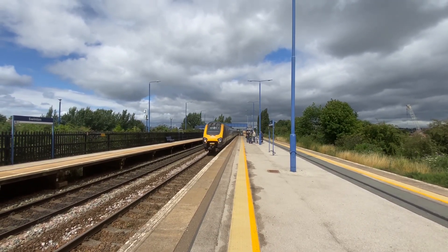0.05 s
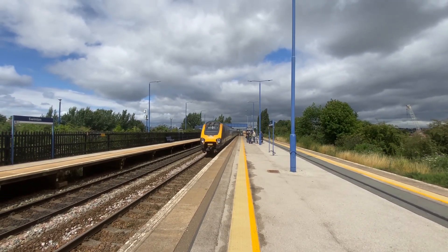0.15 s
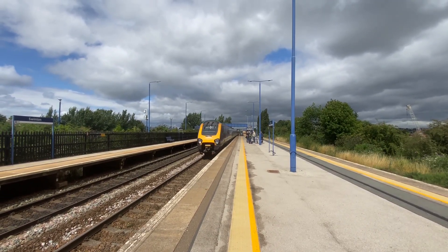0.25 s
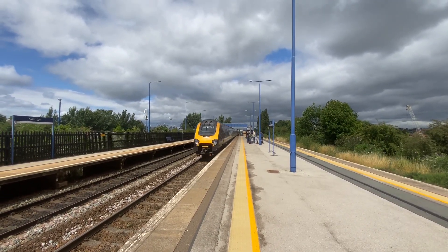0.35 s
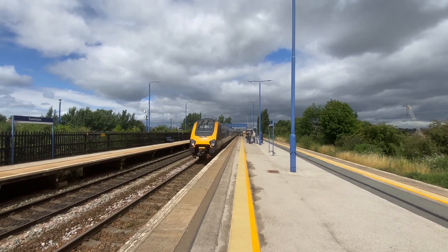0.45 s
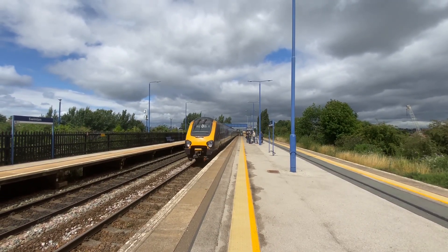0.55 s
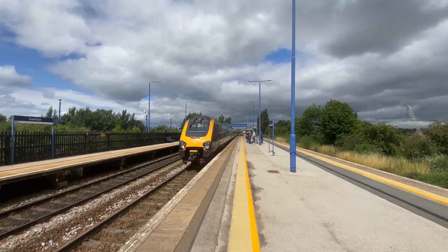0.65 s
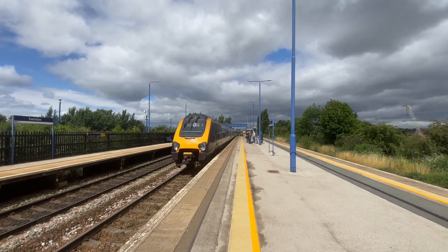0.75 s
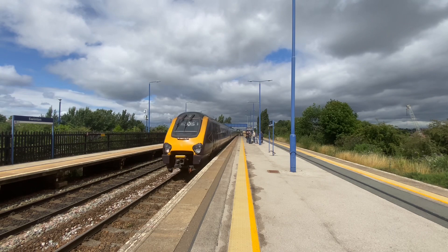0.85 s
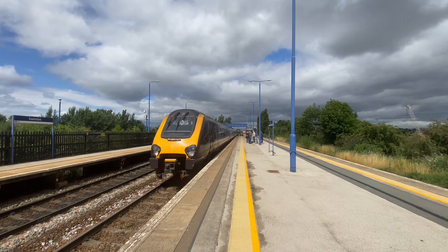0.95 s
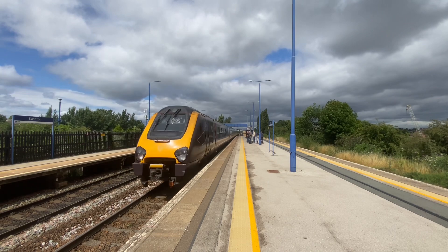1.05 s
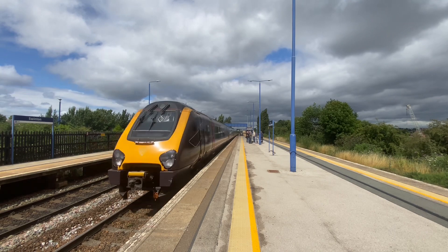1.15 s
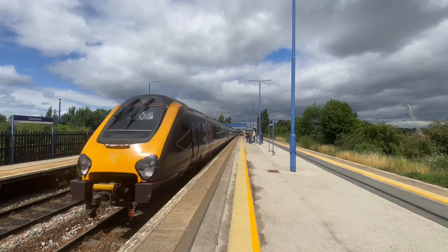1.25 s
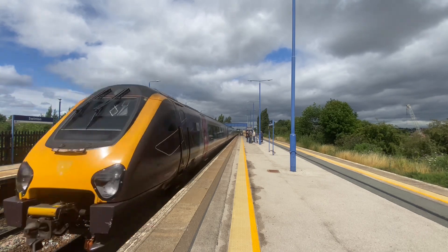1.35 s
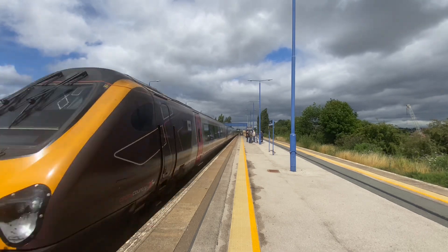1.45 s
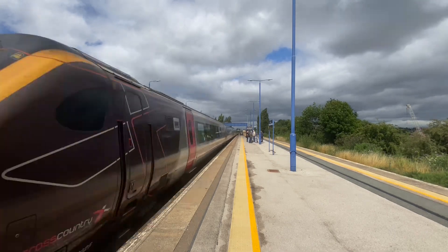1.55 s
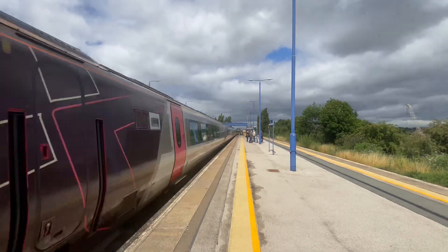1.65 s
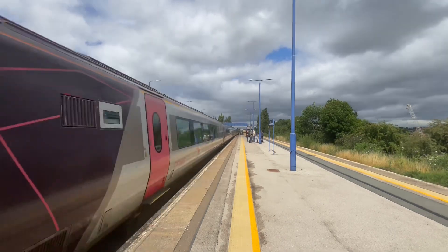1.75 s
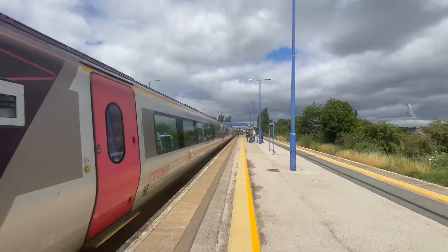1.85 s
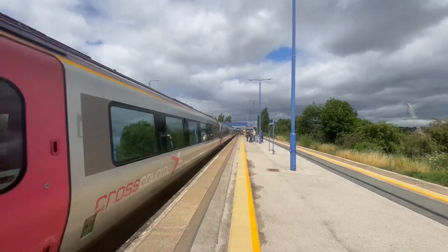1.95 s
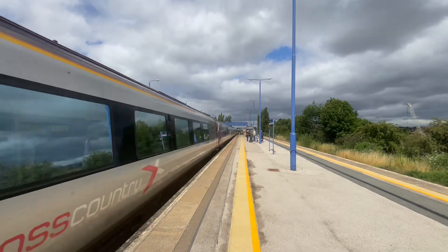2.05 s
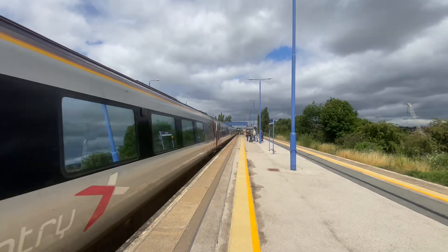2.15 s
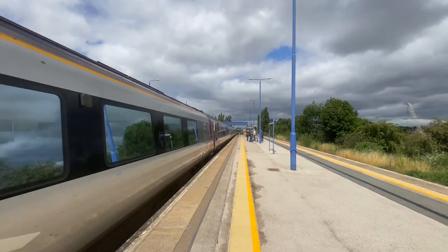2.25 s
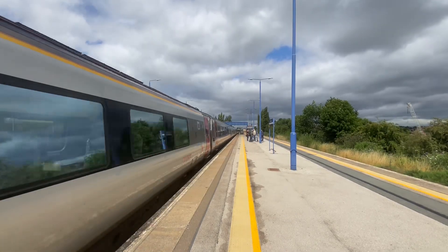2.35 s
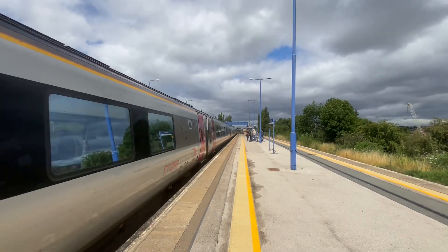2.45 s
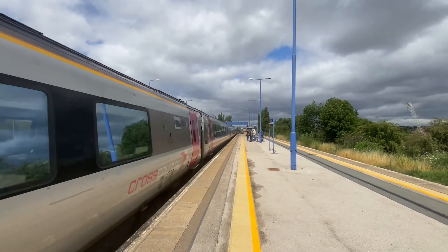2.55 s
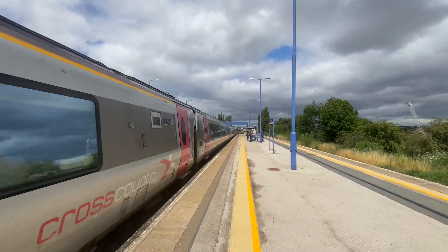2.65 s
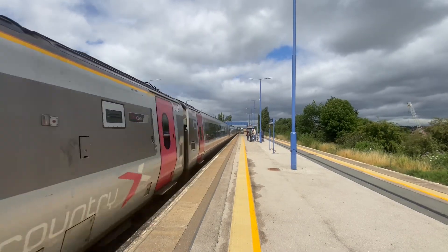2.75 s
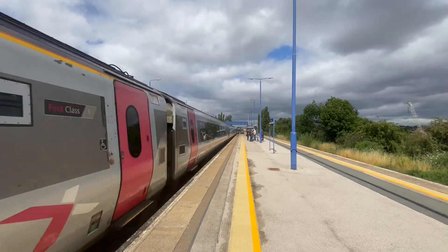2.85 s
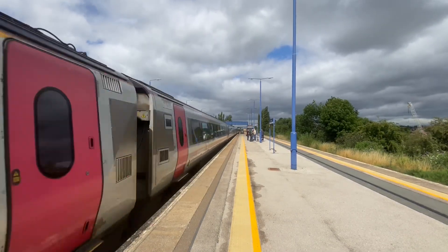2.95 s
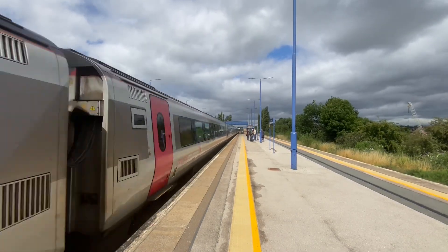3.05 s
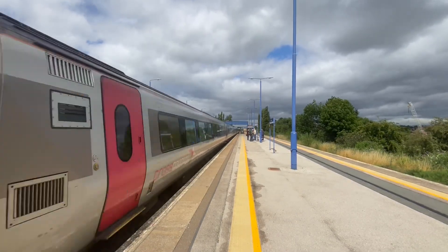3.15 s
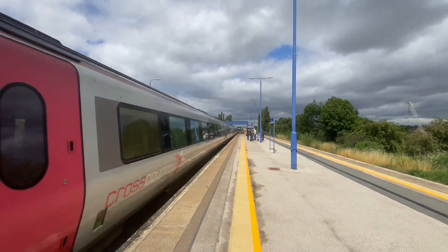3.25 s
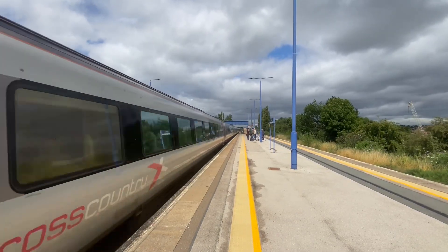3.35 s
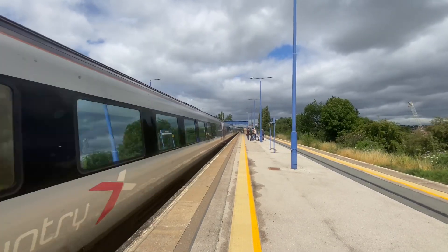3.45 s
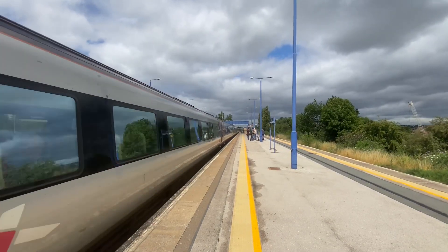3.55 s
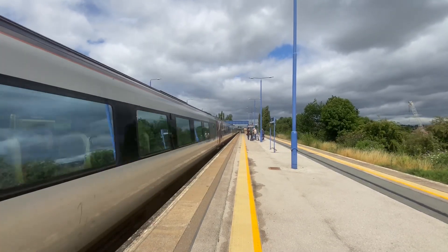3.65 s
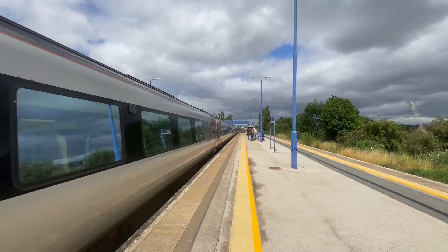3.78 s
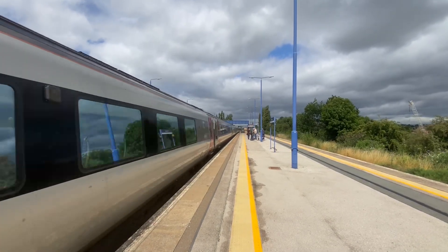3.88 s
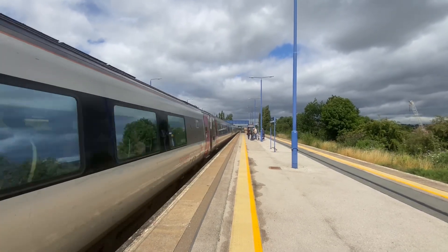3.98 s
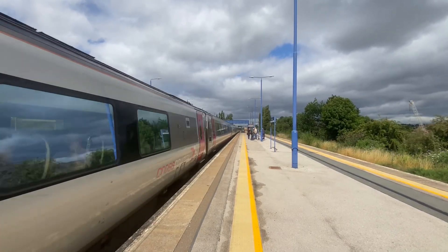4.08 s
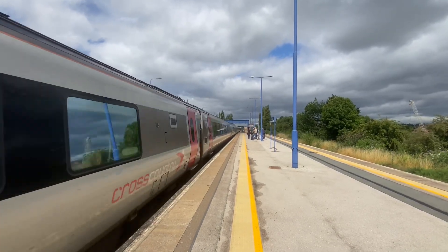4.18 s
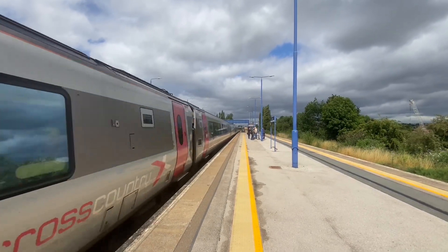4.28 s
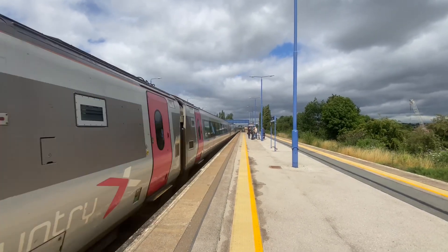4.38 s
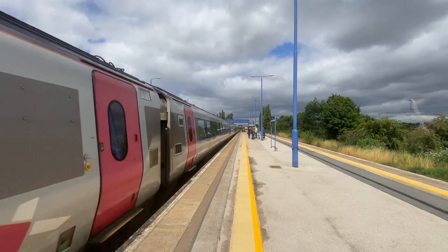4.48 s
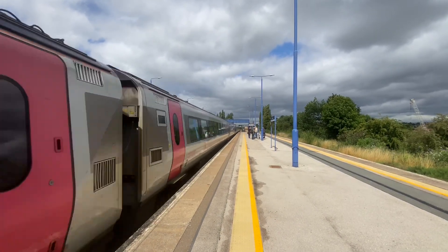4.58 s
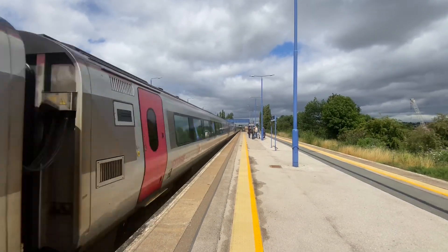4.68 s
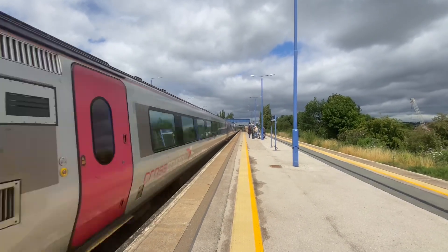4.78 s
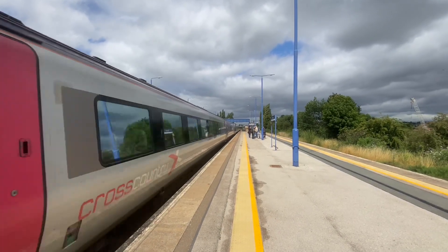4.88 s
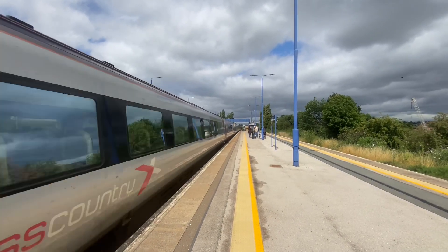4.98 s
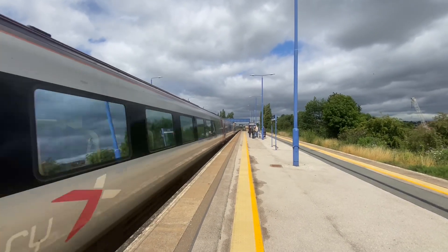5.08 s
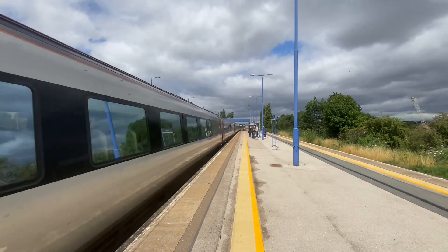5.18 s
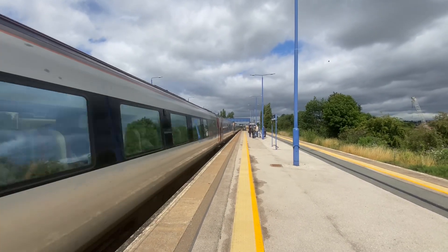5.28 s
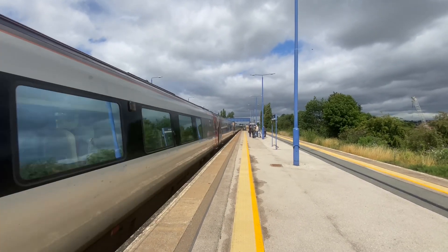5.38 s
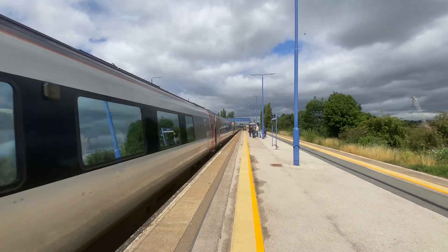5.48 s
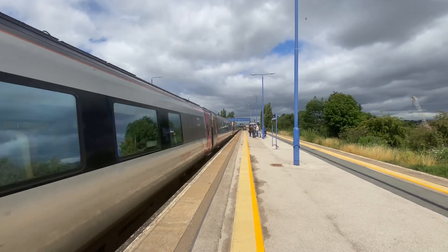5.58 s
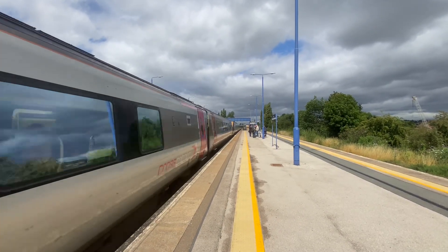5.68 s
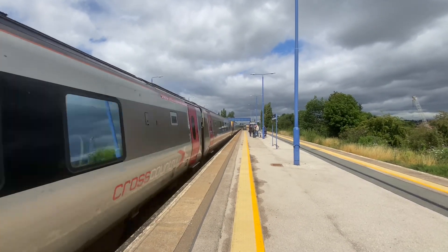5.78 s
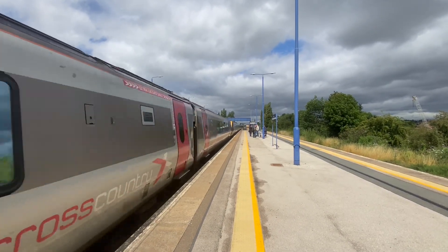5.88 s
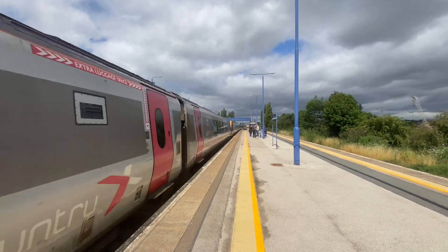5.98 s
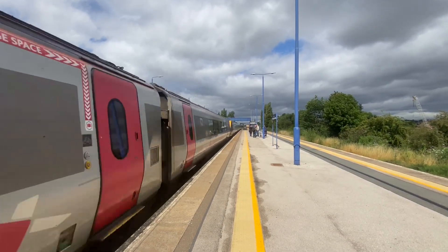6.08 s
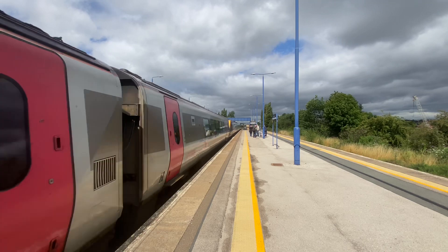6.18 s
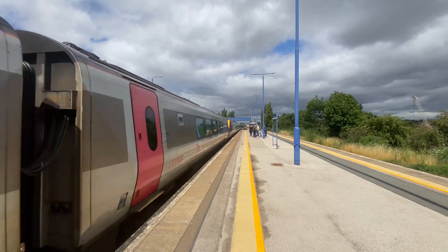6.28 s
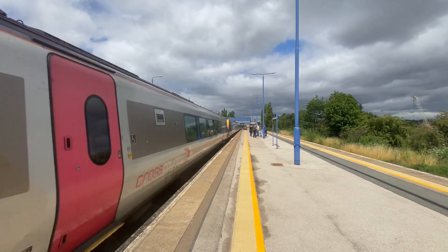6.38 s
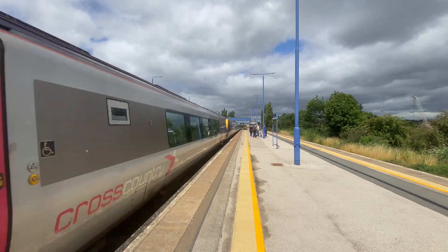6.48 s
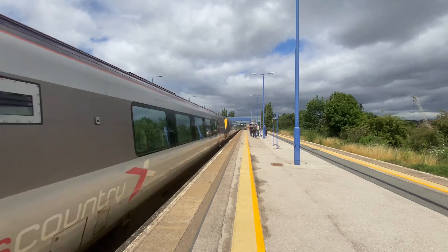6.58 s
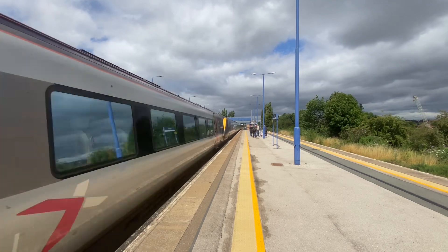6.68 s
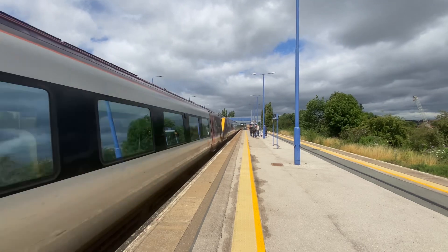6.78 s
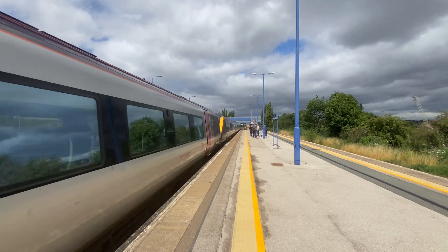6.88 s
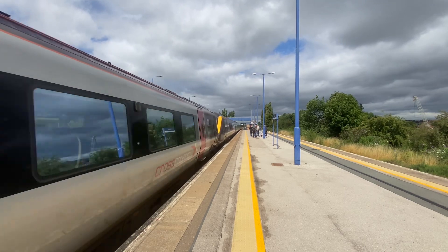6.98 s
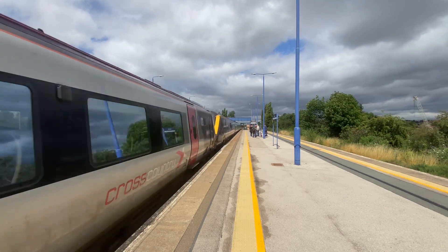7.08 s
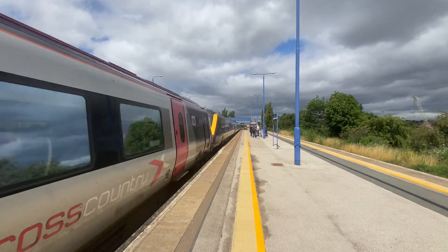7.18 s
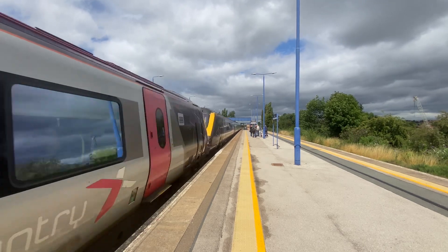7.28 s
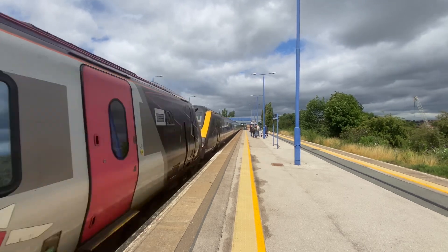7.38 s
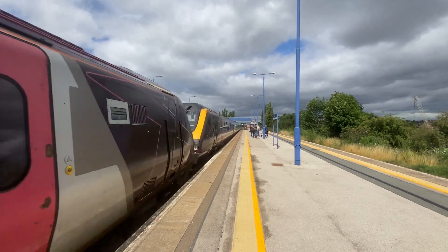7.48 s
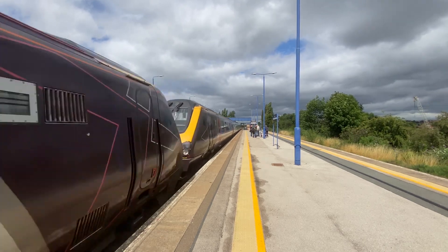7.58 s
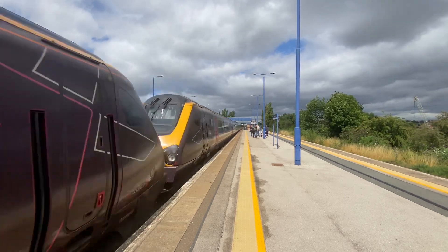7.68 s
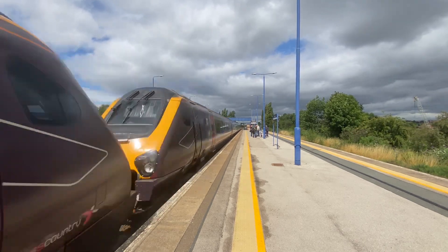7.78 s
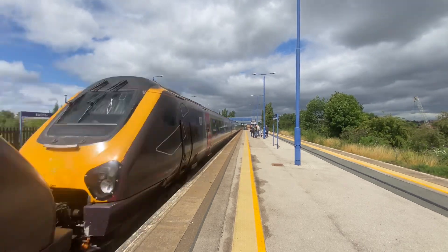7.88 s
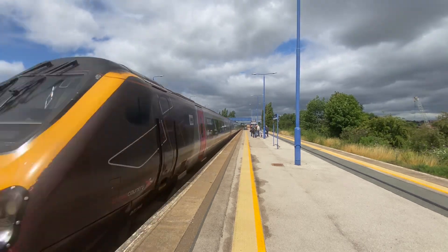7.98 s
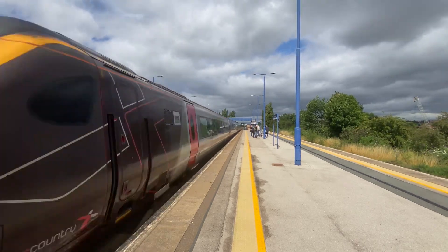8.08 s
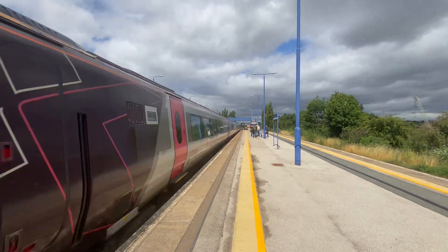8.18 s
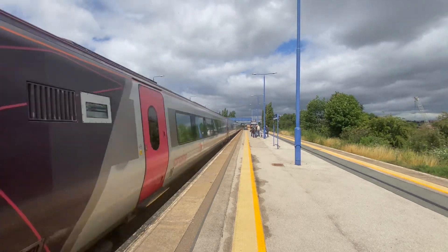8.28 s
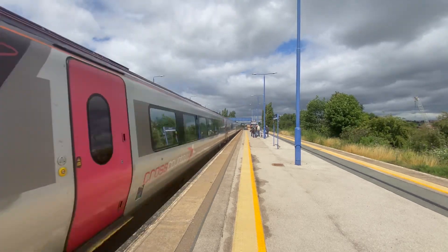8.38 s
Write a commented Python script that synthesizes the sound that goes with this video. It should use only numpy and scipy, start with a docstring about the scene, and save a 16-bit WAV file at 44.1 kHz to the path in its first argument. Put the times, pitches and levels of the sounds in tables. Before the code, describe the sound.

From 0 to 1.5 s, hollow flat-wheel knocks repeat about six times a second, each with a weaker follow-up, growing over a faint rolling hiss and rumble. Around 1.6-2 s the nose passes: sharp steel clanks, chatter, squealing wheels and heavy wind buffeting lasting to 2.4 s. A low steady diesel drone swells near 2.8 s and sinks in pitch, with roar and rattle; a clank at 3.0 and knock at 3.4. A clunk at 4.0 leads into a stronger engine at 4.2-4.6, revving upward. Another, higher and loud, peaks around 5.5-6 amid roar and rattling. Dull heavy clunks hit at 6.75 and 7.05, with a bright airy hiss near 7. Clustered clanks and gusts mark the coupled cabs at 7.55-7.75. Then slightly quieter rolling, thin squeals, trembling whines and a higher engine hum continue to an abrupt end at about 8.4 s. Close stereo, outdoors, short echoes.

```python
"""A train pulls along a platform: thumps as it nears, then engines, machinery and singing bogies swell past in
turn over the roar of rolling. The later engines rev up under load, and gusts rumble in the microphone.
Flat wheels and loose steel are ringing blows, each car's diesel engine is a set of tones tied to its shaft,
and rolling, air and wind are shaped noise. The small microphone has two ports, close to the train."""
import sys
import numpy as np
from scipy import signal
from scipy.fft import rfft, irfft
from scipy.io import wavfile

SR = 44100
rng = np.random.default_rng(int(sys.argv[2]) if len(sys.argv) > 2 else 0)


def persist_wave(psi):
    """Save psi, clipped to +-1, as 16-bit WAV."""
    counts = np.round(np.clip(psi, -1, 1) * 32767).astype(np.int16)
    wavfile.write(sys.argv[1], SR, np.atleast_2d(counts).T)


N = 372204
TIME, FREQS = np.arange(N) / SR, np.fft.rfftfreq(N, 1 / SR)
SPEED = 15  # m/s

# bogies (wheel sets) going by: t/s, rumble level/dB, roar level/dB, wheel ring level/dB, f/Hz of the favoured mode
BOGIES = [(1.839, -23, -26, -31.5, 780), (2.682, -18, -21.5, -30, 780), (2.921, -40, -30, -29, 2760),
          (3.301, -28, -46, -31, 2290), (4.2, -19.5, -24, -29, 780), (4.849, -25, -35, -30.5, 2260),
          (5.98, -23, -22, -28, 831), (6.549, -19, -33, -32.5, 2290), (7.0, -23, -22, -43, 780),
          (7.75, -22.5, -31.5, -41, 2340), (8.401, -31, -35, -40, 2250)]
# what a thumping wheel rings: f/Hz, time to fall 60 dB/s, relative level/dB
THUMP_MODES = [(520, .055, -2), (615, .06, 0), (715, .05, -.5), (835, .04, -3), (1010, .03, -9)]


def gain_of(db):
    """Turns decibels into an amplitude factor."""
    return 10 ** (np.asarray(db) / 20)


def evened(x):
    """Scales a signal to rms 1."""
    return x / np.sqrt(np.mean(x ** 2) + 1e-20)


def read(points, hz):
    """Reads a table at any frequency, joining its points on a log-frequency axis."""
    f, value = np.transpose(points)
    return np.interp(np.log(hz + 1), np.log(f + 1), value)


def noise(gain):
    """Noise of rms 1 with the given gain at each frequency."""
    spectrum = rng.standard_normal(len(FREQS)) + 1j * rng.standard_normal(len(FREQS))
    return evened(irfft(gain * spectrum, N))


def wander(per_s):
    """An irregular drift of rms 1: twenty sines, the fastest at per_s hertz."""
    t = TIME[::128]
    rates = per_s * np.geomspace(1 / 10, 1, 20)
    slow = sum(np.sin(2 * np.pi * (f * t + rng.random())) / f ** 0.14 for f in rates)
    return np.interp(TIME, t, evened(slow))


def ringing(modes):
    """Gain at each frequency of a set of resonances (f/Hz, width/Hz, level/dB)."""
    power = sum(gain_of(db) ** 2 / width / (1 + ((FREQS - hz) / width) ** 2) ** 2 for hz, width, db in modes)
    return np.sqrt(power)


def heard(s, fade=0.18):
    """Fades a source in before its first time and out after its last (fade in seconds)."""
    return np.clip(np.minimum(TIME - s[0], s[-1] - TIME) / fade + 1, 0, 1)


def swell(s, half_s, fall):
    """Gain of something going by at time s, falling with a power of its distance."""
    return np.hypot(1, (TIME - s) / half_s) ** -fall


def plateau(s, half_s, steep=6):
    """Gain that holds around time s and drops quickly on either side."""
    return (1 + abs((TIME - s) / half_s) ** steep) ** -.5


def pass_by(sound, s, metres):
    """A source going past: its pitch falls as the delay turns round; the platform edge hides it from afar."""
    distance = np.hypot(metres, SPEED * (TIME - s))
    arriving = np.interp(TIME - distance / 343, TIME, sound, left=0)  # sound travels 343 m/s
    return arriving * (metres / distance) ** 4


def blows(events, modes, rise_s, rebound_db, rebound_s=.024):
    """Each blow rings slightly detuned modes, and the part lands again just after."""
    t, out = np.arange(SR // 8) / SR, np.zeros(N)
    for s, db in events:
        for delay, drop_db in ((0, 0), (rebound_s, rebound_db)):
            ring = np.zeros(len(t))
            for hz, t60, mode_db in modes:
                phase = 2 * np.pi * (hz * rng.uniform(0.91, 1.05) * t + 0.34 * rng.random())
                ring += gain_of(mode_db - 60 * t / t60) * np.sin(phase)
            ring *= 1 - np.exp(-(t / rise_s) ** 2)
            part = out[round((s + delay) * SR):][:len(t)]  # a view: adding to it adds to out
            part += (gain_of(db + drop_db) * ring / abs(ring).max())[:len(part)]
    return out


def approaching(ahead, alongside, nose_s=1.43, blend_s=0.4):
    """Noise whose colour changes as the nose of the train draws level."""
    near = (1 + np.tanh((TIME - nose_s) / blend_s)) / 2
    near_noise = noise(gain_of(read(alongside, FREQS)))
    far_noise = noise(gain_of(read(ahead, FREQS)))
    return np.sqrt(near) * near_noise + np.sqrt(1 - near) * far_noise


def patchy(x, depth_db, patch_hz, patch_s):
    """Small resonances and reflections come and go as the cars slide by."""
    hz, t, z = signal.stft(x, SR, nperseg=2048)
    widths = (patch_hz / hz[1], patch_s / t[1])
    bumps = [signal.windows.hann(2 * max(round(width), 1) + 1) for width in widths]
    field = evened(signal.fftconvolve(rng.standard_normal(z.shape), np.outer(*bumps), "same"))
    return signal.istft(z * evened(gain_of(depth_db * field)), SR, nperseg=2048)[1][:N]


def loudness(nose_s=1.645, reach_m=5.9, bogie_half_s=0.28, bogie_fall=1.65, burst_fall=1.67):
    """Gains of rumble, roar, rail hiss and air: each grows as the train nears; passing parts add swells."""
    # swells of machinery roar and rushing air, the last four rows together one burst:
    # t/s, half length/s, roar level/dB, metallic hiss level/dB, air level/dB
    bursts = [(2.65, 0.57, -41, -31.5, -44), (4.075, 0.079, -28.5, -52, -58),
              (5.67, 0.2, -19.5, -30.5, -32), (6.697, 0.089, -28, -48, -32.5),
              (6.982, 0.11, -39, -24.5, -22.5), (7.11, 0.067, -36, -26.5, -26),
              (7.216, 0.043, -28, -25.5, -35)]
    ahead = 1 + SPEED * np.maximum(nose_s - TIME, 0) / reach_m  # the first wheels draw level at nose_s
    # steady part: level alongside in dB, and the power of distance by which it falls ahead
    rumble = gain_of(-25) * ahead ** -1.0
    roar = gain_of(-25.5) * ahead ** -0.79
    rail = gain_of(-30.5) * ahead ** -1.43
    air = gain_of(-39.5) * ahead ** -0.85
    second_unit = np.clip((TIME - 7.9) / 0.14, 0, 1)  # the second unit rolls more quietly
    roar = roar * gain_of(-2.5 * second_unit)
    rail = rail * gain_of(-0.5 * second_unit)
    for s, rumble_db, roar_db, _, _ in BOGIES:
        near = swell(s, bogie_half_s, bogie_fall)
        rumble = np.hypot(rumble, gain_of(rumble_db) * near)
        roar = np.hypot(roar, gain_of(roar_db) * near)
    for s, half_s, roar_db, rail_db, air_db in bursts:
        near = swell(s, half_s, burst_fall)
        roar = np.hypot(roar, gain_of(roar_db) * near)
        rail = np.hypot(rail, gain_of(rail_db) * near)
        air = np.hypot(air, gain_of(air_db) * near)
    return rumble, roar, rail, air


def rolling(gains, rumble_flutter_db=0.7, roar_flutter_db=1.1, rail_flutter_db=0.9, air_flutter_db=0.77):
    """Rough wheels on rough rail shake the underframe and the track; rushing air hisses along with them."""
    # underframe rumble, ahead and alongside: f/Hz, relative level/dB per Hz
    rumble_far = [(15, -40), (42, -14), (62, -9), (95, -6), (140, 3.5), (200, 5.5), (250, -2), (290, -6.5),
                  (380, -11), (600, -54)]
    rumble_near = [(15, -36), (28, -28), (42, -4), (70, -2), (100, -2.5), (150, 1.5), (210, 2), (250, -1.5),
                   (290, -12.5), (380, -9.5), (600, -65)]
    # rolling roar, ahead and alongside: f/Hz, relative level/dB per Hz
    roar_far = [(150, -11), (230, -6.5), (300, -10), (400, -8), (550, 0.5), (790, -3), (1000, -3.5),
                (1350, -9), (1900, -6), (2800, -25), (5000, -50)]
    roar_near = [(150, -16), (310, -1), (420, -0.5), (520, 1), (640, -1.5), (790, 0.5), (1000, -2.5),
                 (1350, -7), (1900, -12), (2800, -35), (5000, -63)]
    # hiss of the rails, ahead and alongside: f/Hz, relative level/dB per Hz
    rail_far = [(900, -14), (1600, 0), (2000, 7), (2400, 4.5), (2900, -21), (3500, -4), (4100, -1),
                (5000, -8), (6500, -7), (8000, -18), (13000, -40)]
    rail_near = [(900, -19), (1600, 2.5), (2300, 0), (2750, -5), (3200, -4), (3900, -8), (5000, -11),
                 (6500, -15), (8000, -20), (13000, -50)]
    # rushing air: f/Hz, relative level/dB per Hz
    air_colour = [(800, 6.5), (2000, 7), (3200, 6), (4500, 5), (6300, 1), (8000, 0), (9700, -1),
                  (11500, -1.5), (13000, -16), (15500, -19)]
    rumble = gains[0] * gain_of(rumble_flutter_db * wander(25)) * approaching(rumble_far, rumble_near)
    roar = gains[1] * gain_of(roar_flutter_db * wander(40)) * approaching(roar_far, roar_near)
    rail = gains[2] * gain_of(rail_flutter_db * wander(35)) * approaching(rail_far, rail_near)
    air = gains[3] * gain_of(air_flutter_db * wander(60)) * noise(gain_of(read(air_colour, FREQS)))
    hiss = patchy(rail + air, depth_db=2.2, patch_hz=130, patch_s=.06)
    return rumble + hiss + patchy(roar, depth_db=2.0, patch_hz=70, patch_s=0.13)


def engine(revs, row, waver_db=1.0, uneven_db=-26, fourth_db=-5, silencer_hz=255):
    """Six cylinders fire three times a shaft turn; unequal cylinders add the orders in between."""
    s, double_db, early_db, triple_db, triple_s, fifth_db, seventh_db = row
    times, rates, levels = np.transpose(revs)
    on = heard(times) > 0
    shaft_hz = np.interp(TIME[on], times, rates) / 3
    turns = np.cumsum(shaft_hz) / SR

    def tone(order, gain):
        """A wavering tone at a whole multiple (order) of the shaft rate."""
        level = np.sqrt(2) * (gain * gain_of(waver_db * wander(8)))[on]
        return level * np.cos(2 * np.pi * (order * turns + rng.random()))

    def silenced(order):
        """The silencer holds back a tone above its limit."""
        return (1 + (order * shaft_hz / silencer_hz) ** 12) ** -.5

    firing = gain_of(np.interp(TIME, times, levels))
    # the double of the firing tone has a second lobe ahead of the exhaust
    main_lobe = gain_of(double_db) * swell(s, 0.24, 1.74)
    early_lobe = gain_of(early_db) * swell(s - 0.77, 0.35, 2.95)
    double = np.hypot(main_lobe, early_lobe)
    triple = gain_of(triple_db) * plateau(s, triple_s)
    shaft = swell(s, 0.18, 0.96)
    uneven = gain_of(uneven_db) * np.sqrt(firing * double)
    strong = {3: firing, 5: gain_of(fifth_db) * shaft, 6: double, 7: gain_of(seventh_db) * shaft, 9: triple}
    weak = {4: uneven, 8: uneven, 10: uneven, 11: uneven, 12: gain_of(fourth_db) * triple}
    out = np.zeros(N)
    out[on] = sum(tone(k, g) for k, g in strong.items())
    out[on] += sum(silenced(k) * tone(k, g) for k, g in weak.items())
    return out * heard(times)


def engines(beside_s=0.31, late_s=0.1, fall=2.3):
    """The exhaust notes of five cars, split into sound from along the track and sound from the side."""
    # one list per car, firing tone as heard, revving up and dropping as it goes by: t/s, f/Hz, level/dB
    rev_curves = [
        [(0.0, 59.9, -50), (.6, 59.8, -35.5), (1.0, 59.77, -44), (1.8, 59.8, -35.5), (2.4, 59.56, -20),
         (2.8, 58, -14.5), (3.15, 55.7, -20.5), (3.6, 54.8, -23)],
        [(3.3, 59.5, -34), (3.6, 59.4, -28), (3.95, 60.76, -18.5), (4.25, 63.47, -14), (4.42, 64.27, -17),
         (4.68, 63.95, -19), (5.1, 67.44, -16.5), (5.5, 71.56, -21), (5.8, 75.8, -21)],
        [(4.72, 68.16, -25), (4.92, 70.4, -23), (5.15, 73.37, -18.5), (5.55, 78.4, -11.5), (5.8, 80.53, -16.5),
         (6.0, 81.04, -18.5), (6.19, 80.8, -16.5), (6.27, 80.5, -29), (6.45, 80.6, -29)],
        [(6.4, 85.2, -27), (6.75, 88.35, -22), (6.97, 91.8, -30), (7.15, 93.2, -19.5), (7.3, 92.2, -29.5),
         (8.44, 85.6, -41)],
        [(7.6, 96.5, -34), (8.06, 96.3, -33.5), (8.44, 95.4, -25)],
    ]
    # each engine going by: t/s abreast, level/dB of the firing tone's double, level/dB of the double's early lobe,
    # level/dB of its triple, half length/s of the triple, level/dB of the 5th shaft order, level/dB of the 7th
    passings = [(2.83, -16, -23, -36, 0.56, -31, -18), (4.54, -8.5, -22.5, -20, 0.35, -37, -31),
                (5.98, -11.5, -14, -18.5, 0.27, -22.5, -30), (6.75, -21.5, -30, -33.5, 0.55, -20, -33.5),
                (8.45, -23, -26, -31.5, 0.28, -25.5, -50)]
    notes = np.array([engine(revs, row) for revs, row in zip(rev_curves, passings)])
    beside = np.array([swell(row[0] + late_s, beside_s, fall) for row in passings])
    return (notes * (1 - beside)).sum(0), (notes * beside).sum(0)


def wheel_flats(first_s=.069, turn_s=.1634, second_s=.086, second_db=-9):
    """A flat on a wheel knocks once a turn until it has gone by; a smaller flat on another wheel follows."""
    # the knock as it nears: t/s, peak level/dB
    flat_levels = [(.07, -29), (0.23, -24), (0.39, -17), (.56, -18), (.72, -16.5), (0.88, -16),
                   (1.05, -12.5), (1.21, -15.5), (1.4, -14.5), (1.55, -19)]
    times, levels = np.transpose(flat_levels)
    knock_times = np.arange(first_s, times[-1] + turn_s / 2, turn_s)
    flat = [(s, np.interp(s, times, levels)) for s in knock_times]
    second = [(s + second_s, db + second_db) for s, db in flat]
    return blows(flat + second, THUMP_MODES, rise_s=.0009, rebound_db=-7)


def buffeting(fall=3.0, lumpy_db=2.5, likeness=-0.75):
    """Gusts dragged along by the train rumble in the two ports, mostly pushing on one while pulling on the other."""
    # gusts from the nose, the gaps between cars and the coupled cabs: t/s, half length/s, level/dB
    gusts = [(.2, .13, -41), (0.896, 0.041, -30), (1.318, 0.11, -34), (1.56, 0.048, -27),
             (1.724, 0.12, -20), (1.93, 0.24, -17), (2.192, 0.074, -14.5), (2.41, 0.05, -18),
             (3.47, .07, -30), (4.95, 0.25, -27), (6.27, 0.1, -21), (6.703, 0.11, -19), (7.05, 0.065, -27),
             (7.63, 0.087, -23), (7.831, .14, -21), (8.029, .04, -27)]
    # colour of the wind rumble: f/Hz, relative level/dB per Hz
    wind_colour = [(15, -25), (33, -13), (62, 4.5), (100, -1), (190, -5.5), (260, -7), (400, -16),
                   (900, -55)]
    force = np.sqrt(sum((gain_of(db) * swell(s, half_s, fall)) ** 2 for s, half_s, db in gusts))
    wind = gain_of(read(wind_colour, FREQS))
    both = np.sqrt((1 + likeness) / 2) * noise(wind)
    opposed = np.sqrt((1 - likeness) / 2) * noise(wind)
    lumps = evened(gain_of(lumpy_db * wander(35)))
    return force * lumps * np.array([both + opposed, both - opposed])


def rattle(hits_per_s=110, spread_db=3.0, ring_s=0.024, fall=2.35):
    """Loose running gear chatters at random: many small hits of unequal size, each a short burst of noise."""
    # spells of rattling: t/s, half length/s, level/dB
    spells = [(.85, 0.55, -49), (1.82, .22, -31), (2.855, 0.27, -29), (5.9, .3, -30.5), (7.58, .15, -37)]
    # colour of the rattle: f/Hz, relative level/dB per Hz
    rattle_colour = [(250, -30), (520, -6), (800, 5), (1150, 4), (1500, -1), (2300, 3), (3100, -10.5),
                     (4200, -12), (8000, -53)]
    sizes = gain_of(spread_db * np.minimum(rng.exponential(1, N), 3))
    hits = (rng.random(N) < hits_per_s / SR) * sizes
    keep = float(gain_of(-120 / (ring_s * SR)))  # the power falls 60 dB in ring_s
    power = signal.lfilter([1], [1, -keep], hits ** 2)
    near = np.sqrt(sum((gain_of(db) * swell(s, half_s, fall)) ** 2 for s, half_s, db in spells))
    return near * evened(np.sqrt(power)) * noise(gain_of(read(rattle_colour, FREQS)))


def clunks():
    """The running gear answers uneven track with dull clunks."""
    # clunks: t/s, peak level/dB
    clunk_events = [(1.052, -17), (1.358, -18), (4.003, -10.5), (6.747, -6.5), (6.913, -19), (7.044, -10),
                    (7.646, -13)]
    # what they ring: f/Hz, time to fall 60 dB/s, relative level/dB
    clunk_modes = [(111, 0.054, -13.5), (158, 0.04, 6), (216, 0.083, -1), (345, 0.028, 1)]
    return blows(clunk_events, clunk_modes, rise_s=0.0045, rebound_db=-16)


def squeals(waver=0.00388):
    """Slipping wheels sing briefly on one mode each: grainy, unsteady notes that sink as the wheel goes by."""
    # singing wheels: t/s, half length/s, middle f/Hz, width/Hz (fastest wavering of the note),
    # relative level/dB, pitch glide (share above the middle f at first and below it at last)
    songs = [(1.331, 0.23, 9530, 201, -53.5, .01), (1.422, 0.156, 2250, 89.7, -38.5, .013),
             (1.77, .22, 4870, 139.7, -42, .013), (1.846, 0.143, 2385, 160, -34, .02),
             (2.814, .035, 2435, 128.7, -27, .01), (2.82, 0.128, 4820, 160, -38.5, .013),
             (3.269, .25, 2317, 120.5, -33.5, .013), (4.171, 0.119, 3080, 198, -35, .02),
             (5.74, 0.153, 3052, 258.6, -34, .02), (6.303, .31, 4754, 129.7, -48, .013),
             (7.634, .14, 4960, 151, -39.5, .013), (7.658, 0.134, 2930, 110.3, -41, .013),
             (8.296, 0.173, 4970, 109.8, -41, .006), (8.218, .18, 2170, 60, -33.5, .025),
             (8.362, .08, 2310, 70, -36, .01)]
    out = np.zeros(N)
    for s, half_s, hz, width_hz, db, glide in songs:
        pitch = hz * (1 - glide * np.tanh((TIME - s) / half_s) + waver * wander(14))
        angle = 2 * np.pi * np.cumsum(pitch) / SR
        note = wander(width_hz) * np.sin(angle) + wander(width_hz) * np.cos(angle)
        out += gain_of(db) * plateau(s, half_s) * note / np.sqrt(2)
    return out


def clanks():
    """Steel strikes steel as the cabs and car ends go by; each blow has its own brightness."""
    # blows of wheels and couplings: t/s, peak level/dB, brightness/dB per octave
    clank_events = [(1.614, -10, -1), (1.699, -11.5, -1), (2.045, -17, 4), (3.02, -13, 1), (7.555, -14, -2),
                    (7.575, -13, 0), (7.652, -12, 3), (7.735, -16, -2), (8.063, -19, 1)]
    # what they ring: f/Hz, time to fall 60 dB/s, relative level/dB
    clank_modes = [(787, 0.13, 0), (1015, 0.07, -7), (1156, .09, -2), (1760, .07, -5), (2100, .08, -6),
                   (2480, 0.094, -8.5), (2930, 0.075, -15)]
    out = np.zeros(N)
    for s, db, bright in clank_events:
        modes = [(hz, t60, mode_db + bright * np.log2(hz)) for hz, t60, mode_db in clank_modes]
        out += blows([(s, db)], modes, rise_s=0.0015, rebound_db=-13.5, rebound_s=.013)
    return out


def wheel(favourite_hz, favour_db=6):
    """A ringing wheel, with the modes near one pitch standing out."""
    # resonances of a wheel: f/Hz, width/Hz, relative level/dB
    wheel_modes = [(786, 24, 3), (1158, 53, -2), (2320, 270, 1.5), (2940, 250, -1), (4760, 70, -6),
                   (5400, 220, -10.5), (6510, 88, -10)]
    favoured = []
    for hz, width, db in wheel_modes:
        closeness = np.exp(-(5 * np.log(hz / favourite_hz)) ** 2)
        favoured.append((hz, width, db + favour_db * closeness))
    return noise(ringing(favoured))


def singing_bogies():
    """The ringing wheels of each bogie slide past one by one."""
    return sum(gain_of(db) * pass_by(wheel(hz), s, metres=8) for s, _, _, db, hz in BOGIES)


def rail_knocks():
    """Wheels knock singly on the rail, with the same ring as the flats."""
    # knocks: t/s, peak level/dB
    knock_events = [(1.93, -13), (1.991, -15), (3.359, -10), (4.0, -13)]
    return blows(knock_events, THUMP_MODES, rise_s=.0009, rebound_db=-7)


def cooling_fans():
    """Cooling fans slide past one by one, each a narrow band of noise."""
    # fans passing the microphone: t/s, level/dB
    fan_passes = [(2.35, -35), (4.0, -34), (5.498, -33), (6.1, -30.5), (6.901, -30), (7.42, -28)]
    # resonance of a fan: f/Hz, width/Hz, relative level/dB
    fan_modes = [(1717, 85, 0)]
    fan = ringing(fan_modes)
    return sum(gain_of(db) * pass_by(noise(fan), s, metres=7) for s, db in fan_passes)


def vent(fall=3.1):
    """A narrow jet of air hisses as it sweeps across the microphone."""
    # the jet going by: t/s, half length/s, f/Hz, width/Hz, level/dB
    jet = (7.01, .09, 5400, 1400, -28)
    s, half_s, hz, width_hz, db = jet
    return gain_of(db) * swell(s, half_s, fall) * noise(ringing([(hz, width_hz, 0)]))


def machinery(sink=.023, waver=.0075, flutter_db=2.6):
    """The second unit's machinery whines: rough tones that tremble and sink as their source draws level."""
    # whines: t/s when loudest, half length/s, middle f/Hz, level/dB
    whine_tones = [(8.3, .18, 2835, -34), (8.35, .16, 3540, -38)]
    out = np.zeros(N)
    for s, half_s, hz, db in whine_tones:
        level = np.sqrt(2) * gain_of(db + flutter_db * wander(45)) * plateau(s, half_s)
        pitch = hz * (1 - sink * np.tanh((TIME - s) / half_s) + waver * wander(90))
        out += level * np.sin(2 * np.pi * np.cumsum(pitch) / SR)
    return out


def platform(x, t60=0.63):
    """Scattered echoes between the car sides, the platform and the fence."""
    t = np.arange(SR // 2) / SR
    tail = rng.standard_normal(len(t)) * gain_of(-60 * t / t60)
    return signal.fftconvolve(x, tail / np.linalg.norm(tail))[:N]


def ports(direct, diffuse):
    """The microphone body delays and shades one port; part of the noise reaches each port unrelated."""
    # how far the left port leads: f/Hz, phase/radians
    lead = [(30, 0.3), (130, 0.41), (270, 0.58), (360, 1.55), (520, 1.9), (860, 1.42), (1200, 1.92),
            (1890, 3.07), (2400, 5.05), (3000, 5.94), (4000, 9.07), (5700, 12.95), (6460, 11.6),
            (7750, 15.36), (10400, 11.6)]
    # left port against right: f/Hz, level difference/dB
    tilt = [(130, 1.4), (320, -0.5), (480, 6.5), (700, 9.5), (1000, 5), (1400, -0.5), (1950, -2),
            (3000, 1.5), (4500, 2.5), (7000, 0.5), (8700, -1.5), (9700, -7.5), (11000, 0)]
    # how alike the noise is in the two ports: f/Hz, likeness (0 to 1)
    alike = [(150, .9), (260, .86), (370, .74), (500, .84), (700, .68), (1700, .86), (2100, .68),
             (3200, .64), (4200, .33), (12000, .33)]
    same = np.clip(read(alike, FREQS), 0, 1)
    shared = rfft(direct) + np.sqrt((1 + same) / 2) * rfft(diffuse[0])
    apart = np.sqrt((1 - same) / 2) * rfft(diffuse[1])
    ratio = gain_of(read(tilt, FREQS))
    left = (shared + apart) * ratio
    right = (shared - apart) * np.exp(-1j * read(lead, FREQS))
    return irfft(np.array([left, right]) * np.sqrt(2 / (1 + ratio ** 2)), N)


def scene():
    """Blows, squeals and engines beside us come directly and by echoes; noise comes from all along the train."""
    along, beside = engines()
    gains = loudness()
    thumps = wheel_flats() + clunks() + rail_knocks()
    direct = beside + thumps + clanks() + rattle() + squeals() + machinery()
    echoes = gain_of(-9) * platform(direct)
    # two independent draws of the noise, for the shared and the unrelated part
    one, other = (rolling(gains) + cooling_fans() + singing_bogies() + vent() for _ in range(2))
    return along + ports(direct, [one, other + echoes]) + buffeting()


def record(dry, knee=.7, edge_s=.008, top_hz=15400):
    """The loudest peaks are rounded off and the two ends fade quickly; then the band limit."""
    over = np.maximum(abs(dry) - knee, 0)
    held = np.sign(dry) * (abs(dry) - over + (1 - knee) * np.tanh(over / (1 - knee)))
    held = held * np.clip(np.minimum(TIME, TIME[-1] - TIME) / edge_s, 0, 1) ** 2
    low_pass = signal.firwin(511, top_hz, window=("kaiser", 9), fs=SR)
    return signal.oaconvolve(held, low_pass[None], "same")


dry = scene()
out = record(dry)
persist_wave(out)
```